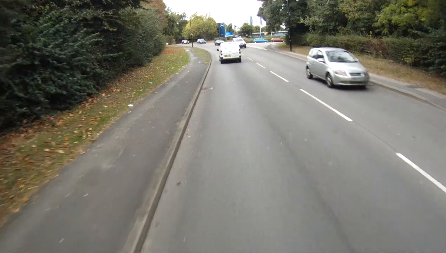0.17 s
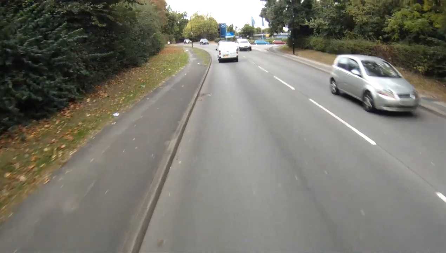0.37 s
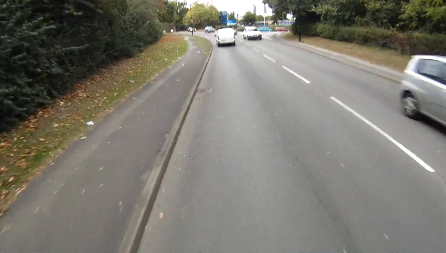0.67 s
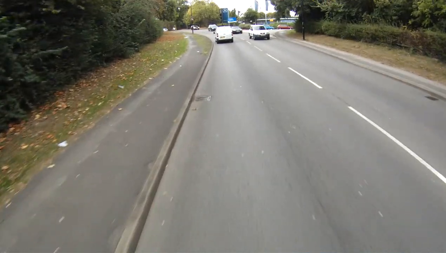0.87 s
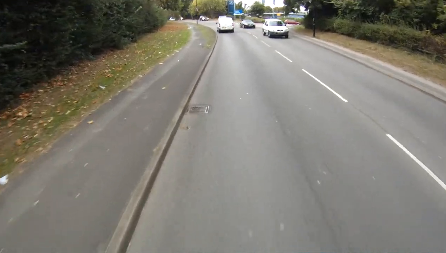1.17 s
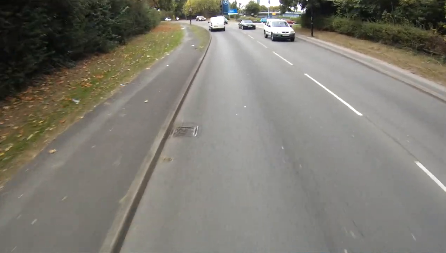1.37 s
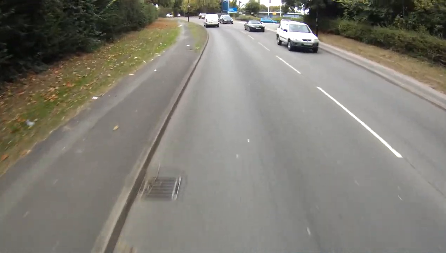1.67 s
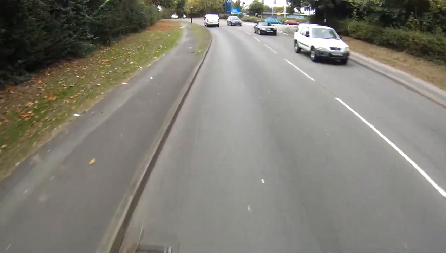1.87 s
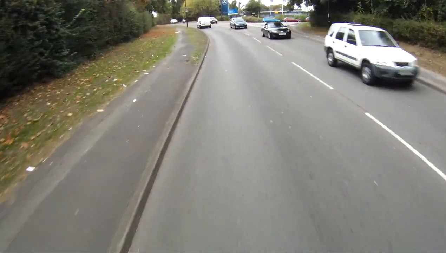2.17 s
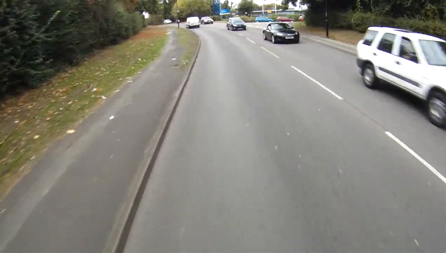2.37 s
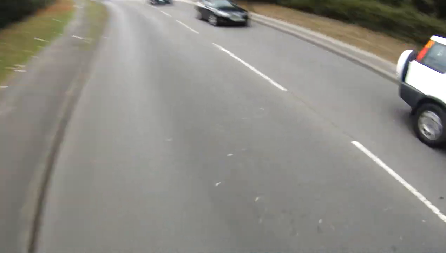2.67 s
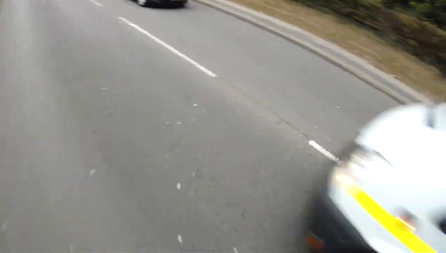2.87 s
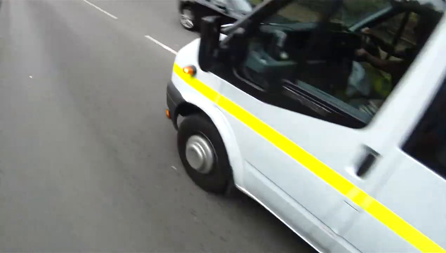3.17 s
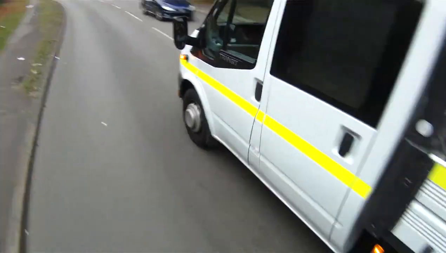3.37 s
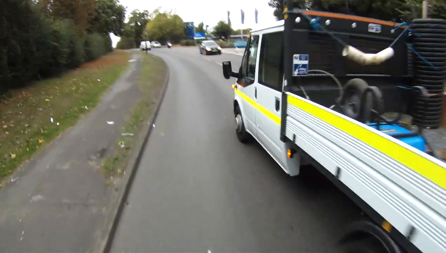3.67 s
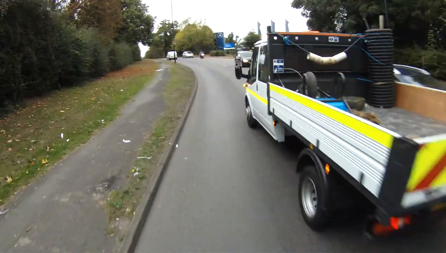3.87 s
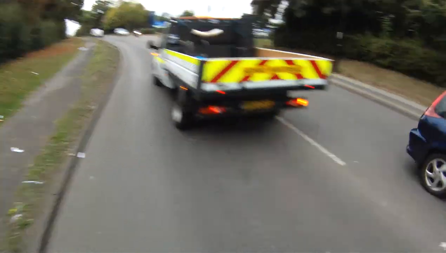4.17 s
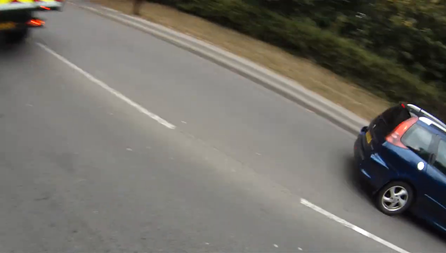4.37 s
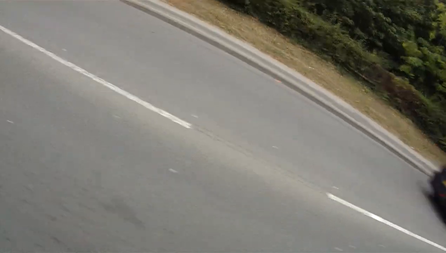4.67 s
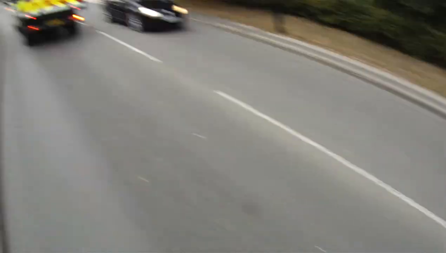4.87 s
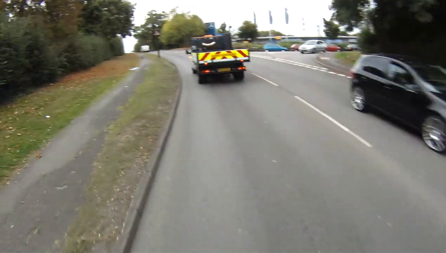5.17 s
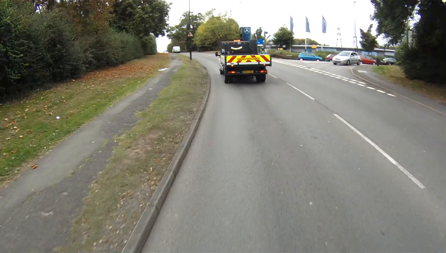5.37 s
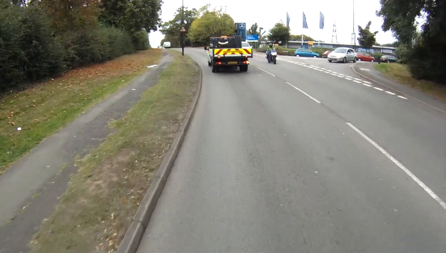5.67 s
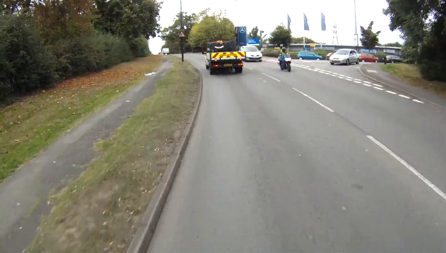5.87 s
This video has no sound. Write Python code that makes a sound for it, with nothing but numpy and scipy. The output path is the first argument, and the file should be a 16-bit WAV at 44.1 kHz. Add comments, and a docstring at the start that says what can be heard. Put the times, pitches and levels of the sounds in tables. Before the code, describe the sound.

A microphone in a small housing travels along a road, nearly mono with dulled treble. The sound fades in quickly at 0.1 s to tyre roar and fluttering wind, with low puffs thumping at 0.15-0.45 s. A car whooshes by around 0.7 s as hard gusts burst at 0.7-0.9 s with a tiny tick. Quieter road follows, with gusts near 1.3 and 1.9-2.2 s. Tyre noise swells to a peak at about 2.95 s as another car and a van pass; the van's low engine hum slowly climbs from 2.2 to 4.5 s. From 3.28 to 3.86 s its single-tone, mid-pitched horn toots, buzzy and bright at first, then wavering and duller. The van draws off. At 4.57 s a loud thump and click strike the housing, followed by heavy buffeting to 4.9 s with a faint squeak at 4.76. It drops to softer wind and tyre noise, rising again towards 6 s.

```python
"""Van overtaking a helmet microphone

Riding along a road, microphone in a helmet camera: near mono, the housing dulling the treble.
Traffic passes as band-shaped tyre noise; wind is random eddies, low rumble and short puff wavelets.
A van overtakes close by: a few low engine orders climb in pitch, and its single-tone horn toots
as a stack of partials that wax and wane apart. Brief ticks and one squeak come from the housing."""
import sys
import numpy as np
from scipy import signal
from scipy.fft import rfft, irfft
from scipy.io import wavfile
from scipy.ndimage import uniform_filter1d

SR = 44100
rng = np.random.default_rng(int(sys.argv[2]) if len(sys.argv) > 2 else 0)


def unload_wav(signal):
    """Save mono or channel-first audio to the path in sys.argv[1] as 16-bit WAV at rate SR, clipped to [-1, 1]."""
    wavfile.write(
        sys.argv[1],
        SR,
        np.round(np.clip(np.atleast_2d(signal).T, -1, 1) * 32767).astype(np.int16),
    )


def magnitude_from_level(level_db):
    """Linear magnitude for a level in decibels (20 dB per decade)."""
    exponent = np.asarray(level_db, float) / 20
    return 10 ** exponent


N = 264996
T = np.arange(N) / SR
HZ = np.fft.rfftfreq(N, 1 / SR)


def curves(table):
    """Columns of a table after its times, drawn over the whole time."""
    s, *columns = np.transpose(table)
    return [np.interp(T, s, c) for c in columns]


def unit(x):
    """Scale to rms 1."""
    return x / np.sqrt(np.mean(x ** 2))


def band(x, hz, octaves):
    """Bell-shaped band-pass on a log-frequency axis."""
    distance = np.log2((HZ + 1) / hz) / octaves
    return irfft(rfft(x) * np.exp(-.5 * distance ** 2), N)


def walk(rate):
    """Random levels held 1 / rate s and slewed twice; spread near 1."""
    k = int(SR / rate)
    held = np.repeat(rng.standard_normal(N // k + 1), k)
    return 1.16 * uniform_filter1d(uniform_filter1d(held, k), k)[:N]


def add_wavelet(out, s, db, hz, cycles, phase):
    """Add one short wavelet centred at s; cycles is its width at half height."""
    t = np.arange(-2048, 2048) / SR
    i = int(s * SR) - len(t) // 2
    envelope = np.exp(-np.log(16) * (t * hz / cycles) ** 2)
    out[i:i + len(t)] += magnitude_from_level(db) * envelope * np.cos(2 * np.pi * hz * t + phase)


# Road level as heard at the microphone: it rises with passing vehicles and dips after hard gusts:
# t/s, tyre roar level/dB, treble against the roar level/dB
TRAFFIC = [(0.1, -49, -3), (0.48, -48.5, -3.5), (0.68, -43.5, -3), (0.88, -52.5, -2.5), (1.43, -58, 2.5),
           (1.95, -51, 1.5), (2.15, -52.5, 3.5), (2.33, -54, 4.5), (2.62, -46.5, 3), (2.85, -43, 5),
           (2.95, -41.5, 5), (3.05, -43, 5.5), (3.3, -45.5, 3.5), (3.66, -46, 5), (3.73, -48.5, 4),
           (3.88, -49.5, 6.5), (4.09, -48, 9), (4.22, -49, 2.5), (4.35, -49, -1.5), (4.46, -45, 0.5),
           (4.54, -47, -1), (4.67, -54.5, -6.5), (4.75, -47.5, -4), (4.88, -56.5, -10.5), (5.04, -54, -3),
           (5.36, -58, 2.5), (6.0, -43.5, 1.5)]
# Spectrum of the tyre roar, its treble dulled by the housing: f/Hz, relative level per Hz/dB
ROAR_SPECTRUM = [(30, -21), (60, -23.5), (120, -31.5), (250, -3.5), (500, -8.5), (900, -4.5), (1700, -7),
                 (2300, -13), (3300, -18), (4300, -30), (5500, -37.5), (7500, -44.5), (10000, -52.5),
                 (14000, -63.5)]


def traffic(flicker_db=1.5, body_db=2.5, ref_hz=2900, ref_width_hz=1800, tilt_hz=2000):
    """Tyre roar in half-octave bands that flicker alone, its treble balance shifting with time."""
    roar_db, treble_db = curves(TRAFFIC)
    hz, db = np.transpose(ROAR_SPECTRUM)
    shape_db = np.interp(np.log(HZ + 1), np.log(hz), db)
    ref_db = np.interp(np.log(ref_hz), np.log(hz), db)
    noise = irfft(rfft(rng.standard_normal(N)) * magnitude_from_level(shape_db - ref_db), N)
    noise *= np.sqrt(SR / 2 / ref_width_hz)
    out = 0
    for centre in 30 * 2 ** np.arange(0, 10, .5):
        tilt = np.log2(centre / tilt_hz) / 2
        treble = np.clip(tilt, 0, 1) * treble_db
        body = np.clip(-2 * tilt, 0, 1) * body_db  # in full under 1 kHz
        out = out + band(noise, centre, 0.23) * magnitude_from_level(flicker_db * walk(9) + treble + body)
    return out * magnitude_from_level(roar_db)


# Wind over the microphone port, between the puffs:
# t/s, turbulence level/dB, low rumble level/dB, small eddies against large level/dB
WIND = [(0.1, -50, -49, -5), (0.3, -46, -53, -0.5), (0.65, -33, -46, -6), (0.92, -39.5, -38.5, -7.5),
        (1.18, -37, -45.5, -7), (1.47, -44.5, -44.5, -10), (1.57, -41, -37, -6), (1.68, -44.5, -53, -11),
        (2.05, -39.5, -42.5, -11.5), (2.45, -47, -52, 2.5), (2.7, -43, -54, 5.5), (2.95, -42.5, -58, 5),
        (3.4, -57, -63, 10), (3.67, -46, -44, 10), (3.82, -53, -62, -1), (4.1, -44.5, -46, 1.5),
        (4.5, -49, -54, -1), (4.6, -38, -64, 0.5), (4.85, -33, -54, 2.5), (4.97, -61, -64.5, -1),
        (5.35, -50.5, -59.5, -1.5), (5.98, -42, -44.5, 5.5)]
# Strongest puffs of wind on the port: t/s, peak level/dB (before the port's bleed), f/Hz, length/cycles
PUFFS = [(0.149, -22.5, 296, 0.96), (0.172, -15.5, 343, 0.15), (0.228, -15.5, 306, 1.5),
         (0.243, -13.5, 368, 0.65), (0.319, -13, 390, 0.19), (0.33, -21, 345, 1.9), (0.376, -20, 310, 1.1),
         (0.417, -11, 316, 0.97), (0.431, -20, 369, 1.9), (0.528, -18, 338, 1.7), (0.55, -21, 355, 1.2),
         (0.59, -24.5, 347, 2.8), (0.721, -19, 284, 1.6), (0.734, -14, 322, 0.6), (0.753, -10.5, 334, 0.81),
         (0.762, -12.5, 250, 0.93), (0.77, -15.5, 300, 0.68), (0.789, -21, 323, 1.6),
         (0.827, -19, 480, 0.9), (0.832, -18.5, 460, 2.8), (0.841, -10, 308, 0.45), (0.879, -24, 243, 1.6),
         (0.92, -20.5, 255, 0.49), (1.32, -26, 480, 0.92), (1.325, -14, 268, 1.1), (1.344, -13, 343, 0.63),
         (1.404, -20, 290, 1.14), (1.567, -21, 310, 0.73), (1.87, -25, 253, 2), (1.876, -15.5, 377, 0.83),
         (1.897, -19.5, 300, 0.73), (1.977, -26, 330, 0.85), (1.995, -15, 297, 1.2), (2.037, -24, 260, 0.8),
         (2.144, -23, 328, 1.9), (2.173, -10.5, 360, 0.89), (2.193, -22, 305, 3), (2.208, -14.5, 250, 0.52),
         (2.226, -23, 300, 1.2), (2.934, -22, 455, 0.92), (2.948, -22, 600, 0.84), (2.962, -22.5, 400, 1),
         (3.675, -17.5, 200, 0.3), (3.688, -18.5, 170, 1), (4.224, -24.5, 256, 1.6), (4.55, -24, 295, 2.2),
         (4.563, -6.5, 306, 0.83), (4.571, -21, 330, 0.82), (4.59, -32, 300, 2.3), (4.627, -15, 470, 0.58),
         (4.642, -18, 462, 0.45), (4.678, -16.5, 404, 0.73), (4.701, -29, 347, 1.8),
         (4.718, -19, 461, 0.81), (4.736, -21.5, 370, 1), (4.777, -16.5, 520, 0.8), (4.791, -13, 436, 0.77),
         (4.807, -24.5, 340, 11), (4.855, -17, 355, 1), (4.872, -17, 423, 0.69), (4.886, -18, 476, 0.86)]


def wind(rate=450, scatter_db=4.5, ceiling_db=11, large_hz=190, small_hz=520, octaves=0.61, rumble_hz=75,
         gust_db=-22.5, gust_s=.018, gust_small_db=-9, gust_rumble_db=-14):
    """Small eddies strike the port at random, harder around each puff; their mean flow rumbles."""
    eddy_db, rumble_db, small_db = curves(WIND)
    s, peak_db = np.transpose(PUFFS)[:2]
    # each puff rides on a swell of turbulence, gust_db against the puff's peak
    power = np.zeros(N)
    power[(s * SR).astype(int)] = magnitude_from_level(peak_db + gust_db) ** 2
    swell = np.exp(-((T[:SR // 2] - 1 / 4) / gust_s) ** 2)
    gust = np.sqrt(np.abs(signal.fftconvolve(power, swell, "same")))

    chance = rng.random((2, N))
    strength_db = np.minimum(-scatter_db * np.log(chance[1] + 1e-9), ceiling_db)
    eddies = (chance[0] < rate / SR) * magnitude_from_level(strength_db) * rng.choice([-1, 1], N)
    large = unit(band(eddies, large_hz, octaves))
    small = unit(band(eddies, small_hz, octaves))
    rumble = unit(band(rng.standard_normal(N), rumble_hz, 0.91))

    # steady flow and gusts add in power
    out = large * np.hypot(magnitude_from_level(eddy_db), gust)
    out += small * np.hypot(magnitude_from_level(eddy_db + small_db), gust * magnitude_from_level(gust_small_db))
    return out + rumble * np.hypot(magnitude_from_level(rumble_db), gust * magnitude_from_level(gust_rumble_db))


# The housing, right at the microphone, ticks under the hardest puffs and once squeaks:
# t/s, peak level/dB (before the port's bleed), f/Hz, length/cycles
TICKS = [(.7362, -33, 9250, 2.2), (.7364, -39, 5000, 1.6), (.7268, -54, 11000, 1.5),
         (.8338, -53, 10000, 1.2), (0.84, -56, 11000, 1.2), (4.571, -24, 2200, 0.65),
         (4.571, -27.5, 6200, .9), (4.762, -46.5, 2800, 82)]


def puffs_and_ticks(edge_db=-14, cut_hz=110):
    """Each puff sucks at the membrane for about a cycle; the housing's ticks are far shorter."""
    out = np.zeros(N)
    twists = rng.standard_normal(len(PUFFS))
    for (s, db, hz, cycles), twist in zip(PUFFS, twists):
        add_wavelet(out, s, db, hz, cycles, np.pi + 1.0 * twist)
        # the steep front of the puff
        add_wavelet(out, s, db + edge_db, 2.72 * hz, 1.1, np.pi + 0.39 * twist)
    for s, db, hz, cycles in TICKS:
        add_wavelet(out, s, db, hz, cycles, np.pi / 2)
    # the port bleeds off slow pressure
    return signal.sosfilt(signal.butter(2, cut_hz, "high", fs=SR, output="sos"), out)


# Van engine, passing close by: t/s, half the firing rate f/Hz, its level/dB, firing rate level/dB
ENGINE = [(2.2, 58, -58, -50), (2.6, 62, -56, -49), (2.85, 64, -49, -46), (3.1, 66, -45, -49),
          (3.35, 68, -49, -48), (3.6, 70, -57, -45), (3.75, 71, -52, -53), (4.1, 73, -44, -52),
          (4.4, 75, -48, -51), (4.55, 76, -56, -52)]


def engine(third_db=-8, fourth_db=-4, fade_s=0.075):
    """Low orders of a four-cylinder engine pulling away, as multiples of half the firing rate."""
    hz, half_db, fire_db = curves(ENGINE)
    phase = 2 * np.pi * np.cumsum(hz) / SR
    lines = magnitude_from_level(half_db) * np.sin(phase) + magnitude_from_level(fire_db) * np.sin(2 * phase)
    upper = magnitude_from_level(third_db) * np.sin(3 * phase) + magnitude_from_level(fourth_db) * np.sin(4 * phase)
    lines += magnitude_from_level(fire_db + 1 * walk(12)) * upper
    to_nearest_end = np.minimum(T - ENGINE[0][0], ENGINE[-1][0] - T)
    return np.sqrt(2) * lines * np.clip(to_nearest_end / fade_s, 0, 1)


# Horn note at the microphone while the van draws ahead and reflections shift:
# t/s, pitch f/Hz, 1st partial level/dB, 2nd partial level/dB, 3rd partial level/dB
HORN_NOTE = [(3.283, 521, -33, -35, -24), (3.315, 529, -32, -33, -26), (3.35, 533, -29.5, -36, -32),
             (3.39, 532, -29.5, -33, -36), (3.435, 534, -29.5, -32, -41), (3.465, 533, -29, -28, -37),
             (3.5, 531, -32.5, -30, -33), (3.535, 530, -31.5, -32.5, -36), (3.565, 528, -31, -33, -44),
             (3.59, 528, -30, -42, -40), (3.615, 529, -31, -32, -36), (3.645, 529, -37, -34, -36),
             (3.67, 530, -35, -29, -45), (3.7, 531, -32, -28, -40), (3.765, 526, -35, -35, -38),
             (3.79, 524, -37, -32, -40), (3.815, 527, -39, -36, -42), (3.843, 528, -33, -29, -41),
             (3.86, 527, -37, -37, -38)]
# Upper horn partials swell and fade, each at its own time, as reflections interfere:
# multiple of the pitch, peak level/dB, loudest at t/s, rise/(dB per s), fading/(dB per s)
HORN_UPPER = [(4, -42, 3.33, 10, 15), (5, -47, 3.49, 8, 25), (6, -45.5, 3.445, 90, 32),
              (7, -50, 3.385, 130, 32), (8, -61, 3.6, 8, 45), (9, -65.5, 3.62, 8, 40),
              (10, -68, 3.6, 35, 50), (11, -72, 3.62, 10, 60), (13, -72, 3.385, 50, 25),
              (14, -76, 3.4, 40, 25), (15, -79, 3.42, 40, 40), (17, -76, 3.42, 70, 40)]


def horn(on_s=3.283, off_s=3.86, rise_s=.005, fall_s=.009, wake_db=.7, wake_growth_db_per_s=3,
         wake_rad_per_db=.2, waver_rad_per_s=.7, upper_shake=1.5):
    """A buzzing diaphragm whose partials wax and wane apart as reflections interfere."""
    since = np.clip(T - on_s, 0, 1)
    hz, *low_db = curves(HORN_NOTE)
    partials = [(k + 1, db, 1) for k, db in enumerate(low_db)]
    for k, peak_db, s, rise_db, fade_db in HORN_UPPER:
        db = peak_db - np.maximum(rise_db * (s - T), fade_db * (T - s))
        partials.append((k, db, upper_shake))

    # the whole note wavers, smearing the upper partials
    phase = 2 * np.pi * np.cumsum(hz) / SR + waver_rad_per_s * since * walk(70)
    # the van's wake shakes each partial in level and phase, more as it draws ahead
    flutter_db = wake_db + wake_growth_db_per_s * since
    out = 0
    for k, db, shake in partials:
        angle = k * phase + k * k + wake_rad_per_db * flutter_db * walk(40)
        out = out + magnitude_from_level(db + shake * flutter_db * walk(90)) * np.sin(angle)
    gate = np.clip((T - on_s) / rise_s, 0, 1) * np.exp(-np.maximum(T - off_s, 0) / fall_s)
    return np.sqrt(2) * out * gate


def scene():
    """One microphone feeds both channels."""
    mono = traffic() + wind() + puffs_and_ticks() + engine() + horn()
    return np.array([mono, mono])


def low_pass(x):
    """Removes everything above the highest recorded frequency."""
    return signal.sosfilt(signal.butter(12, 15000, fs=SR, output="sos"), x)


def record(dry):
    """The sound fades in; the channels differ by a hiss and a faint, randomly gated difference."""
    start_s, fade_s = 0.078, .012
    # the gated difference lies mostly in the lower bands
    gate = magnitude_from_level(-24) * np.clip(walk(32) - .25, 0, 1)
    side = gate * band(dry[0], 700, 3)
    # each channel's own circuit hiss
    hiss = [magnitude_from_level(-85) * unit(band(rng.standard_normal(N), 7200, .8)) for _ in dry]
    mix = dry + np.array([-side, side]) + hiss
    return low_pass(mix * np.clip((T - start_s) / fade_s, 0, 1))


dry = scene()
out = record(dry)
unload_wav(out)
```